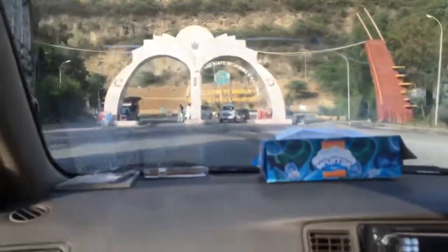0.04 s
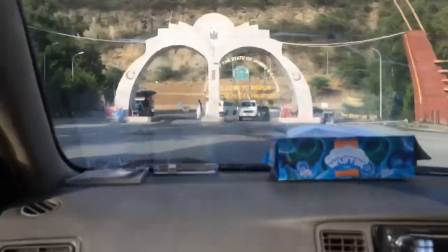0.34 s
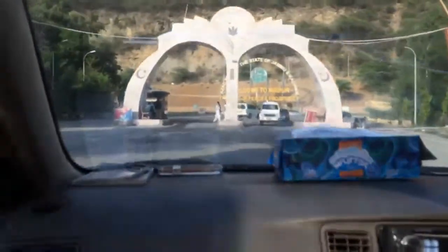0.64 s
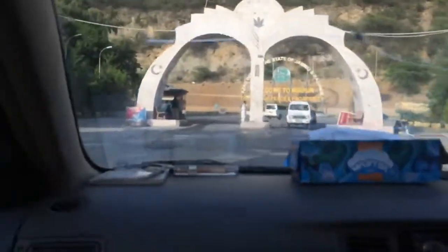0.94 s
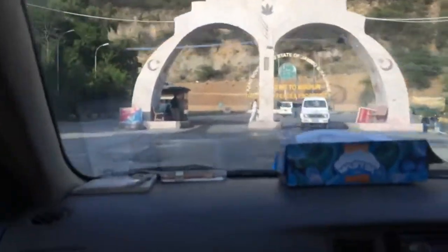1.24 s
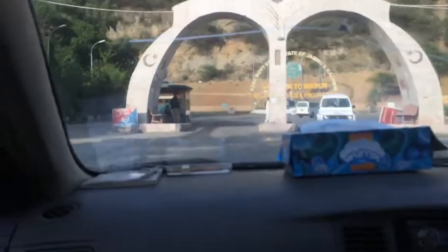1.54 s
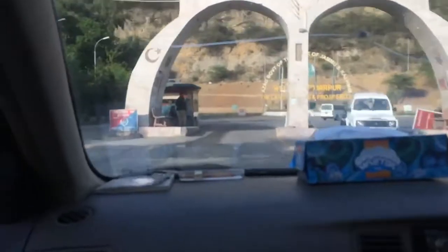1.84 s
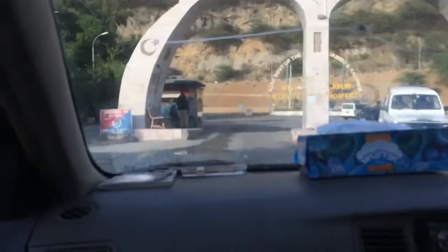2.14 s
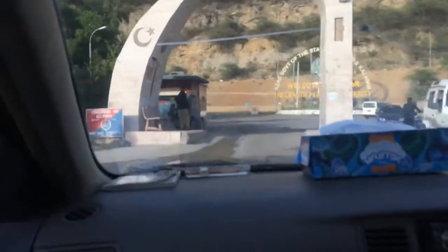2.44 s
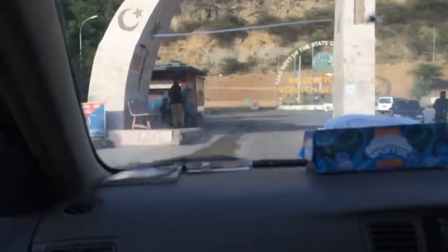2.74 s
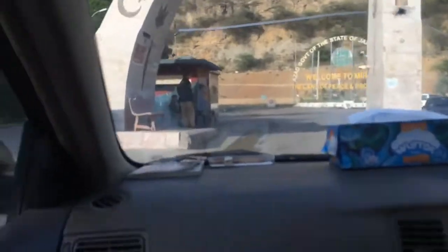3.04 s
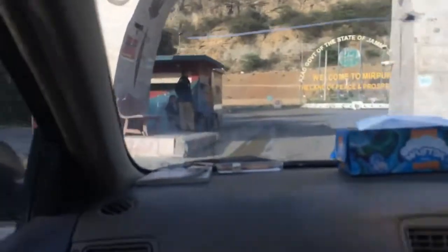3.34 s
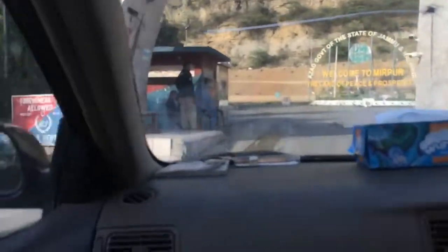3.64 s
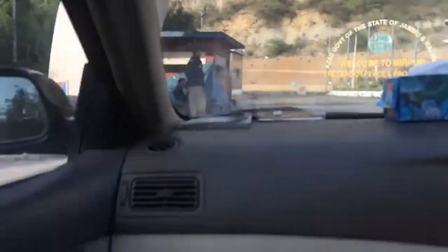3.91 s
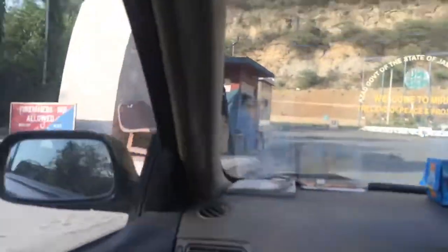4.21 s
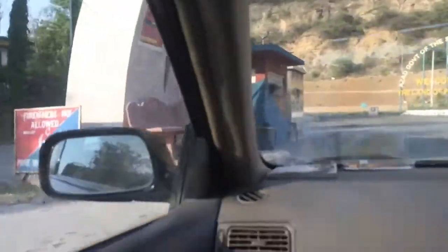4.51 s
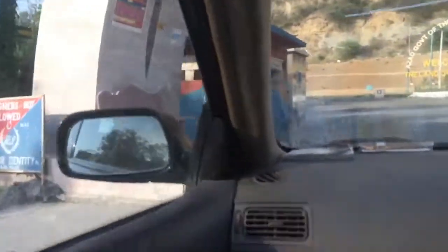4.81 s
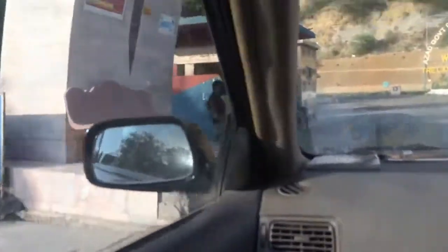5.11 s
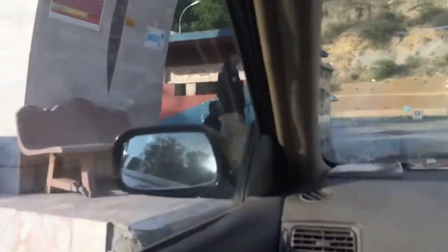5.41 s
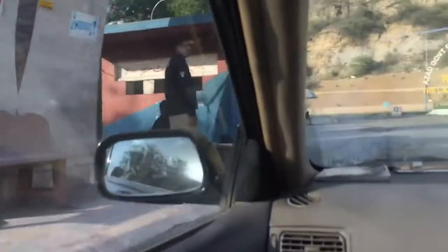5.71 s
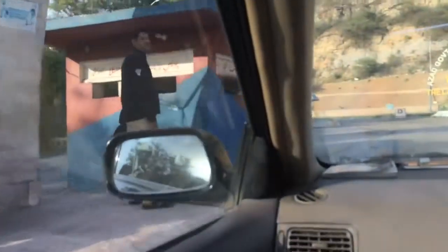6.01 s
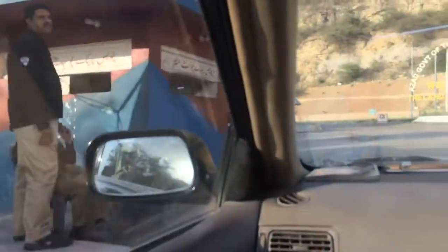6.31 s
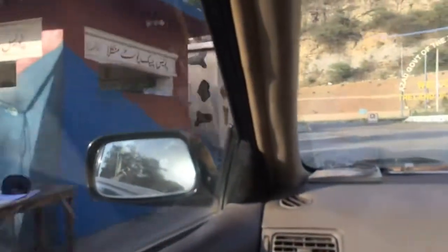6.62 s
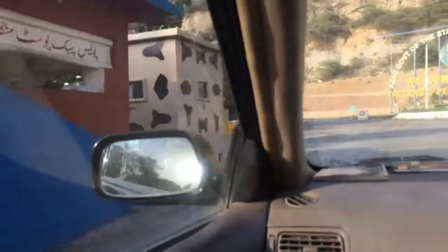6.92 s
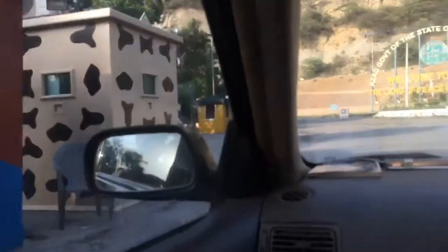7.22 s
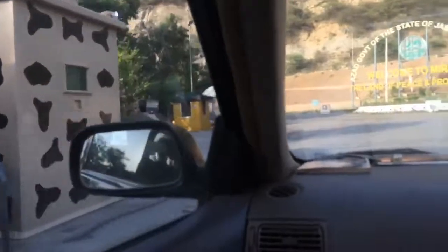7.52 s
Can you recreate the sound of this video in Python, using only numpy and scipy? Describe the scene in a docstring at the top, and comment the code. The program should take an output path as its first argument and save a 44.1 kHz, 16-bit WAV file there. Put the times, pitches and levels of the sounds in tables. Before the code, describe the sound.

Heard from inside the cabin, a car rolls slowly with a heavy low rumble, tyre roar and a diesel hum. Bumps rock the body, making the dashboard knock and the plastic trim chirp faintly. As the car passes through a stone gate, engine clatter and tyre hiss bounce off the walls and come in at an open side window. A deep, throbbing boom then fills the cabin to the end.

```python
"""A car's body heaves and booms, heard from inside as it rolls slowly through a stone gate.
Uneven ground rocks the body, and bumps make the plastic trim chirp and knock. Then the cabin air
settles into a deep boom. Underneath, the tyres roar and the diesel engine hums. Close walls throw
engine clatter and tyre hiss back in through an open side window."""
import sys
import numpy as np
from scipy import signal
from scipy.fft import rfft, irfft, next_fast_len
from scipy.io import wavfile
from scipy.ndimage import uniform_filter1d, minimum_filter1d, map_coordinates

SR = 44100
rng = np.random.default_rng(int(sys.argv[2]) if len(sys.argv) > 2 else 0)


def store_pcm(level_fs):
    """Save levels as 16-bit WAV."""
    pcm = np.round(np.clip(level_fs, -1, 1) * 32767).astype(np.int16)
    wavfile.write(sys.argv[1], SR, np.atleast_2d(pcm).T)


N = 341775


def amp(db):
    """Turn decibels into a number to multiply by."""
    return 10 ** (np.asarray(db) / 20)


def unit(x):
    """Scale a sound to an average strength (rms) of 1."""
    return x / np.sqrt(np.mean(x ** 2) + 1e-20)


def clock():
    """The time of every sample, in seconds."""
    return np.arange(N) / SR


def curves(rows):
    """Join a table's rows with straight lines: one curve for each column after the time."""
    times, *columns = np.transpose(rows)
    return [np.interp(clock(), times, column) for column in columns]


def swell(peak_s, width_s):
    """A bell-shaped rise and fall, still at 60% width_s either side of the peak."""
    return np.exp(-.5 * np.minimum(np.abs(clock() - peak_s) / width_s, 10) ** 2)


def passing(closest_s, db, width_s):
    """The strength of the echo off a passing wall, halved width_s either side of its closest moment."""
    return amp(db) / (1 + ((clock() - closest_s) / width_s) ** 2)


def wobble(per_s):
    """A smooth curve through per_s random values each second."""
    t = clock()[::8]
    points = rng.standard_normal(int(N * per_s / SR) + 4)
    return np.interp(clock(), t, map_coordinates(points, [t * per_s]))


def filtered(x, response):
    """Turn each frequency up or down by response(hz)."""
    size = next_fast_len(N + SR // 2)
    return irfft(rfft(x, size) * response(np.fft.rfftfreq(size, 1 / SR)), size)[:N]


def noise(colour):
    """Noise whose colour, its mix of lows and highs, follows a table."""
    table_hz, db = np.transpose(colour)
    gain = lambda hz: amp(np.interp(np.log(hz + 1), np.log(table_hz), db, -120, -120))
    return unit(filtered(rng.standard_normal(N), gain))


def ringing(notes):
    """Noise that rings in a few narrow bands."""
    gain = lambda hz: sum(amp(db) / (1 + ((hz - pitch) / width) ** 2) ** 1.5 for pitch, width, db in notes)
    return unit(filtered(rng.standard_normal(N), gain))


def patchy(x, depth_db):
    """Make random patches of time and pitch louder or softer."""
    spectrum = signal.stft(x, nperseg=1024)[2]
    patches = uniform_filter1d(rng.standard_normal(spectrum.shape), size=4, axis=0)
    patches = unit(uniform_filter1d(patches, size=14, axis=1))
    return unit(signal.istft(spectrum * amp(depth_db * patches), nperseg=1024)[1][:N])


def levelled(x, give):
    """Even out a noise's chance swells; less give makes it steadier."""
    outline = np.abs(signal.hilbert(x, next_fast_len(N))[:N])
    return unit(x / (outline + give))


def tone(hz, waver):
    """A clean note that wavers a little in pitch and loudness."""
    phase = 2 * np.pi * np.cumsum(hz) / SR
    return np.sqrt(2) * amp(1.8 * wobble(13)) * np.sin(phase + waver * wobble(12))


def fuzzy_tone(hz, width_hz):
    """A rough note: narrow noise around a steady or sliding pitch."""
    phase = 2 * np.pi * np.cumsum(hz + np.zeros(N)) / SR
    return unit(wobble(width_hz) * np.sin(phase) + wobble(width_hz) * np.cos(phase))


def firings(per_s, knock_at_s, ring_s, valve_tick):
    """A diesel's loudness pattern: a knock at each firing, a weaker valve tick halfway to the next."""
    count = np.cumsum(per_s) / SR
    count -= np.interp(knock_at_s, clock(), count)
    strength = amp(.8 * rng.standard_normal(4096))[np.floor(count).astype(int)]
    knock = lambda age_s: (1 - np.exp(-age_s / .0005)) * amp(-60 * age_s / ring_s)
    return unit(strength * knock(count % 1 / per_s) + valve_tick * knock((count + .5) % 1 / per_s))


# Patches of sand: peak_s, level_db, width_s
SAND_PATCHES = [(0.19, -67.5, 0.019), (1.39, -69, 0.11), (4.005, -70, 0.04), (4.2, -71.5, 0.12),
                (4.347, -71, 0.023), (4.503, -63, 0.025), (4.59, -63.5, 0.026), (4.87, -67, 0.18),
                (6.656, -66, 0.012)]

def sand():
    """Sand rustles briefly as a tyre rolls over it."""
    level = sum(amp(db) * swell(s, width) for s, db, width in SAND_PATCHES)
    colour = [(2000, -8), (4500, .5), (8500, -.5), (12000, -3.5), (15500, -11)]
    return level * unit(amp(2.4 * wobble(630)) * noise(colour))


# Colour of a distant diesel: frequency_hz, level_db
FAR_DIESEL_COLOUR = [(700, -24.5), (1600, -3.5), (2400, 2.5), (3200, -7.5), (4200, -16), (6500, -19.5),
                     (10000, -24.5), (15000, -42.5)]

def roadside_diesel():
    """Another, slower diesel clatters and fades behind the car."""
    start_db, hold_s, fade_db_per_s = -54, .11, 62
    clatter = firings(np.full(N, 32.0), knock_at_s=.014, ring_s=.08, valve_tick=.4)
    level_db = start_db - fade_db_per_s * np.maximum(clock() - hold_s, 0)
    return amp(level_db) * clatter * noise(FAR_DIESEL_COLOUR)


# Notes the pulleys ring at: pitch_hz, width_hz, level_db
PULLEY_NOTES = [(1040, 32, 1.5), (1510, 32, -4), (1280, 57, -1.5), (1660, 40, 4.5), (2330, 45, -7.5),
                (2520, 49, -9), (5850, 140, -19), (7750, 200, -19), (8040, 72, -11), (8500, 130, -15),
                (9300, 230, -20.5)]

def belt():
    """The belt's rising whine and the thin ring of its pulleys bounce off a hut by the gate."""
    peak_s, peak_db, hz_at_peak, rise_hz_per_s = 5.52, -49.5, 779, 125
    hz = hz_at_peak + rise_hz_per_s * (clock() - peak_s)
    whine = np.sqrt(2) * np.sin(2 * np.pi * np.cumsum(hz) / SR + .83 * wobble(55))
    pulleys = passing(closest_s=5.88, db=-53.5, width_s=.32) * ringing(PULLEY_NOTES)
    return amp(peak_db) * swell(peak_s, width_s=.2) * whine + pulleys


# Whines from the parts that turn the wheels: peak_s, pitch_hz, level_db, width_s, width_hz
DRIVE_WHINES = [(0.558, 496.2, -46.5, 0.37, 80.6), (0.6, 869, -52, 0.42, 89.9), (.4, 345.6, -52, .35, 90.3),
                (1.45, 1495, -61, 0.31, 373), (2.998, 351.3, -51, .22, 90.8), (3.45, 2026, -69, 0.061, 60),
                (3.952, 1940, -61.5, 0.073, 258.7), (4.89, 1070, -54.5, 0.26, 89),
                (4.893, 1524, -55.5, 0.055, 80), (6.145, 506.4, -48, 0.23, 69.95),
                (6.852, 482.4, -47.5, 0.41, 85.2), (6.793, 869, -59.5, 0.8, 69.9)]

def drive_train():
    """Rough notes come and go as the load on the drive train changes."""
    return sum(amp(db) * swell(s, width_s) * fuzzy_tone(hz, width_hz)
               for s, hz, db, width_s, width_hz in DRIVE_WHINES)


def squeak(start_s, hz, length_s, glide, rough):
    """Two surfaces stick and slip: a rough note that swells, slides and stops."""
    progress = np.linspace(0, 1, round(length_s * SR))
    waver = np.interp(progress * length_s, np.arange(256) / 1500, rng.standard_normal(256))
    pitch = hz * (1 + glide * (progress - .5) + rough * waver)
    sound = np.sqrt(np.abs(np.sin(np.pi * progress))) * np.sin(2 * np.pi * np.cumsum(pitch) / SR)
    return np.pad(sound, (round(start_s * SR), N))[:N]


def brake():
    """A brake pad sings once, very high."""
    return amp(-53) * squeak(start_s=3.783, hz=9140, length_s=.044, glide=.004, rough=.026)


def faint_chirps(flex, tries):
    """Chance slips, likelier the more the body twists, as rows of start_s, level_db, pitch_hz."""
    when, luck, size, pitch = rng.random((tries, 4)).T
    start_s = when * N / SR
    rows = np.column_stack([start_s, -70.5 + 6 * size, 4180 + 600 * (pitch - .5)])
    return rows[luck < np.interp(start_s, clock(), flex)]


# Twists of the body on uneven ground: peak_s, strength (0 to 1), width_s
BODY_TWISTS = [(0.714, 0.6, 0.37), (2.145, 0.3, 0.2), (3.162, 1, 0.54)]
# The loudest chirps: start_s, level_db (before a 3 dB cut), pitch_hz
LOUD_CHIRPS = [(.402, -62, 4400), (.744, -62, 4520), (.806, -63, 4550), (.822, -62, 4550),
               (.866, -62, 4730), (1.014, -60.5, 4500), (1.755, -71, 4440), (2.025, -62, 4300),
               (2.128, -68, 4150), (2.213, -69, 4300), (2.24, -64, 4540), (2.27, -63.5, 4350),
               (2.363, -53.5, 4470), (2.46, -56, 4380), (2.524, -55, 4400), (2.589, -56.5, 4420),
               (2.735, -61, 4220), (2.795, -59, 4400), (2.904, -56, 4480), (3.01, -60, 4500),
               (3.11, -63, 4350), (3.193, -58, 3980), (3.227, -57, 4020), (3.325, -59, 4000),
               (3.517, -60, 4030), (3.535, -55, 4170), (3.587, -63.5, 4240), (4.243, -57, 4413),
               (4.299, -54, 4420)]

def trim_squeaks():
    """The plastic trim rubs, chirping and chattering as the body twists."""
    flex = sum(strength * swell(s, width) for s, strength, width in BODY_TWISTS)
    chirps = sum(amp(db - 3) * squeak(s, hz, length_s=.012, glide=-.06, rough=.039)
                 for s, db, hz in [*LOUD_CHIRPS, *faint_chirps(flex, tries=300)])
    chatter = unit(amp(5.9 * wobble(90)) * fuzzy_tone(4200, width_hz=890))
    return chirps + amp(-74) * flex * chatter


def strike(start_s, ring_s):
    """The loudness of one hit: a quick rise, and a fall of 60 dB in ring_s."""
    age_s = clock() - start_s
    return np.clip(age_s / .0014, 0, 1) * amp(-60 * np.clip(age_s / ring_s, 0, 3))


# Knocks on the dashboard: start_s, level_db, ring_s, snap_db
DASH_KNOCKS = [(2.552, -42, 0.028, -58), (2.562, -42.5, 0.06, -57), (2.74, -44, 0.04, -53),
               (2.748, -43, 0.06, -62), (2.7625, -37.5, 0.06, -44), (2.768, -41.5, 0.055, -60),
               (2.773, -43, 0.05, -50), (2.9254, -44, 0.04, -54), (2.937, -47, 0.025, -55),
               (2.954, -47, 0.044, -58), (3.672, -42, 0.048, -61)]
# Notes of snapping plastic: pitch_hz, width_hz, level_db
SNAP_NOTES = [(2406, 98, 8.5), (2720, 140, 2), (4370, 440, -13.5)]
# Tiny ticks in the trim: start_s, level_db
TRIM_TICKS = [(2.378, -57), (2.397, -59), (2.553, -61), (2.745, -58), (2.768, -60), (2.826, -58),
              (2.88, -64), (2.966, -58)]
# Colours of the knocks and the ticks: frequency_hz, level_db
DASH_COLOUR = [(300, -6), (550, 12.5), (1000, 11), (1400, 8), (1900, -1), (2650, -11.5), (3300, -15),
               (4400, -12.5), (5500, -19.5), (8000, -22.5), (12000, -49.5)]
TICK_COLOUR = [(2500, -18.5), (4500, -0.5), (6500, 1.5), (8200, -4.5), (11000, -21.5), (15000, -30)]

def dashboard():
    """Loose things hit the dashboard, each with a plastic snap; the trim ticks around them."""
    knocks = sum(amp(db) * strike(s, ring_s) for s, db, ring_s, _ in DASH_KNOCKS)
    snaps = sum(amp(db) * strike(s, ring_s=.045) for s, _, _, db in DASH_KNOCKS)
    ticks = sum(amp(db) * strike(s, ring_s=.014) for s, db in TRIM_TICKS)
    return (knocks * levelled(noise(DASH_COLOUR), give=1.2)
            + snaps * levelled(ringing(SNAP_NOTES), give=.4)
            + ticks * noise(TICK_COLOUR))


# Panel notes set off by bumps: peak_s, pitch_hz, level_db, width_s
PANEL_NOTES = [(2.334, 810, -39, 0.0083), (2.327, 405, -42, 0.027), (2.344, 170, -30.5, 0.019),
               (2.564, 202.6, -32, 0.014), (4.064, 448.4, -46, 0.019), (4.172, 445, -43.5, 0.091),
               (4.19, 187, -32, 0.052), (5.453, 66, -26.5, 0.035)]

def panels():
    """The wheels hit bumps, and body panels answer with short, dull notes."""
    return sum(amp(db) * swell(s, width) * levelled(fuzzy_tone(hz, width_hz=.25 * hz), give=.67)
               for s, hz, db, width in PANEL_NOTES)


# How fast the engine fires: time_s, firings_per_s
ENGINE_SPEED = [(0, 43), (.5, 43), (.8, 44.6), (1.6, 44.6), (2.1, 43.3), (2.6, 46), (3.3, 47), (4.1, 46.4),
                (4.5, 42.3), (4.8, 41.5), (5.1, 41.7), (5.3, 42.8), (5.55, 46), (6.1, 45), (6.7, 43.2),
                (7.1, 43.4), (7.35, 47), (7.75, 47.2)]
# Notes in its hum: multiple (of the firing rate), level_db
HUM_NOTES = [(2, 3), (3, -3), (4, -7.5)]
# Its note under load, at five times the firing rate: time_s, level_db
LOAD_NOTE_LEVEL = [(0, -52.5), (2.4, -51), (2.9, -45.5), (3.3, -43.5), (3.8, -45.5), (4.2, -52),
                   (5.6, -53.5), (6.1, -50), (6.9, -48.5), (7.2, -51), (7.5, -45), (7.75, -49)]
# Colour of each firing's crack: frequency_hz, level_db
CRACK_COLOUR = [(500, -27), (1000, -9), (1500, -7.5), (1800, -1), (2300, -2.5), (2700, -7.5), (4000, -15),
                (6000, -16), (8500, -15), (11000, -19.5), (15000, -43.5)]
# Notes of the engine block and the valve cover: pitch_hz, width_hz, level_db
BLOCK_NOTES = [(1817, 125, 7.5), (2000, 170, -1.5), (2380, 220, -2.5)]
COVER_NOTES = [(3070, 170, 3), (3950, 510, -8), (4360, 300, -8), (5570, 120, -5), (5900, 190, 1)]

def engine():
    """The engine hums through the body; its firings ring the metal and echo off the gate wall."""
    rate, = curves(ENGINE_SPEED)
    hum = amp(-40) * unit(sum(amp(db) * tone(multiple * rate, waver=.36) for multiple, db in HUM_NOTES))
    load_note = amp(curves(LOAD_NOTE_LEVEL)[0]) * tone(5 * rate, waver=.4)
    crack = firings(rate, knock_at_s=5.1595, ring_s=.025, valve_tick=.25) * noise(CRACK_COLOUR)
    blows = firings(rate, knock_at_s=5.1595, ring_s=.042, valve_tick=.22)
    block = blows * levelled(ringing(BLOCK_NOTES), give=.4)
    cover = blows * levelled(ringing(COVER_NOTES), give=.4)
    knock_echo = passing(closest_s=5.17, db=-45, width_s=.19) * (amp(-13) * crack + block)
    cover_echo = passing(closest_s=5.3, db=-54, width_s=.15) * cover
    return hum + load_note + knock_echo + cover_echo


# Kerb, gate, hut and tower going by: closest_s, hiss_db, grit_db, width_s
PASSING_WALLS = [(4.55, -53.5, -72.5, 0.51), (5.2, -53.5, -58, 0.4), (5.85, -58.5, -70.5, 0.71),
                 (7.351, -61.5, -74, 0.74)]
# Colours of tyre hiss and fizzing grit: frequency_hz, level_db
HISS_COLOUR = [(600, -28.5), (1000, 1), (1500, -0.5), (1850, 0), (2400, -2), (3100, -8), (4200, -14),
               (5800, -15), (8000, -16), (12000, -50.5)]
GRIT_COLOUR = [(2000, -16.5), (3500, 3), (5000, -1), (6000, -4), (8200, -4), (9500, -6), (11500, -13),
               (15000, -24)]

def window_hiss():
    """Tyre hiss and grit come in at the window, swelling as each wall throws them back."""
    open_road_hiss_db, open_road_grit_db = -62, -82
    hiss_power = amp(open_road_hiss_db) ** 2
    grit_power = amp(open_road_grit_db) ** 2
    for s, hiss_db, grit_db, width in PASSING_WALLS:
        hiss_power += passing(s, hiss_db, width) ** 2
        grit_power += passing(s, grit_db, width) ** 2
    hiss = amp(1.1 * wobble(130)) * patchy(noise(HISS_COLOUR), depth_db=2.5)
    grit = amp(2.6 * wobble(300)) * patchy(noise(GRIT_COLOUR), depth_db=2.3)
    return np.sqrt(hiss_power) * hiss + np.sqrt(grit_power) * grit


# How coarse the road is, smoother at the gate: time_s, roughness_db
ROAD_ROUGHNESS = [(0, 8.5), (.55, 11), (1.7, -3.5), (2.3, -0.5), (3.2, -1.5), (3.7, -9.5), (4.7, -2),
                  (5.05, -29), (5.4, -4.5), (5.75, -12), (6.25, -7), (7.75, -18)]
# Hum of the tread: time_s, pitch_hz, level_db
TYRE_HUM = [(0, 165, -40), (.3, 160, -32.5), (.65, 150, -31), (.95, 143, -35.5), (1.25, 140, -30),
            (1.7, 132, -36), (2.05, 127, -30.5), (2.45, 122, -31), (2.75, 116, -33.5), (3.1, 120, -36.5),
            (3.8, 120, -47.5), (5.0, 125, -49.5), (6.2, 130, -41.5), (7.75, 128, -45.5)]
# Roar of the tread: time_s, level_db
ROAR_LEVEL = [(0, -40.5), (.7, -41.5), (1.1, -43), (2.7, -43.5), (3.8, -45), (4.2, -42), (4.45, -44),
              (4.75, -42), (5.1, -45.5), (5.75, -45.5), (6.0, -42.5), (7.3, -44), (7.75, -45.5)]
# Colours of the floor's drone and the tread's roar: frequency_hz, level_db
FLOOR_COLOUR = [(70, -34), (105, -6.5), (135, 4), (165, 0.5), (200, -2.5), (240, -4), (290, -11),
                (400, -27.5), (800, -63)]
ROAR_COLOUR = [(150, -25.5), (270, -8), (330, 2.5), (385, -2), (490, 4), (600, -1.5), (740, -4),
               (870, -4.5), (1000, -9), (1300, -15.5), (1800, -20), (3000, -47.5), (6000, -59)]

def tyres():
    """The tread roars, and hums lower as the car slows; coarser road makes the floor drone louder."""
    load = wobble(13)  # uneven asphalt presses on the tyres and lets go
    road_db, = curves(ROAD_ROUGHNESS)
    hum_hz, hum_db = curves(TYRE_HUM)
    roar_db, = curves(ROAR_LEVEL)
    hum = amp(hum_db + 1.5 * load) * fuzzy_tone(hum_hz, width_hz=21)
    drone = amp(-36.5 + .35 * road_db + 1.4 * load) * noise(FLOOR_COLOUR)
    roar = amp(roar_db + .16 * load + wobble(60)) * patchy(noise(ROAR_COLOUR), depth_db=1.03)
    return hum + drone + roar


# Low notes in the cabin: peak_s, pitch_hz, level_db, width_s
AIR_NOTES = [(.25, 85, -33.5, .14), (.6, 143, -34.5, .13), (.95, 133, -34.5, .18), (1.5, 132, -35, .14),
             (1.83, 78.6, -27.5, .13), (2.2, 130.5, -28.5, .17), (2.45, 145.5, -30, .14),
             (2.88, 85, -22, .11), (3.1, 134, -30.5, .17), (3.457, 80, -31, 0.076), (5.37, 132, -37, .13),
             (6.3, 133.4, -37, .22), (6.38, 148.3, -42, .13), (7.35, 129.2, -37, .25)]

def cabin_notes():
    """Road and engine stir the cabin air in soft, low swells."""
    return sum(amp(db) * swell(s, width) * tone(hz, waver=.36) for s, hz, db, width in AIR_NOTES)


# The deep boom: time_s, pitch_hz, level_db
CABIN_BOOM = [(4.8, 24.69, -26.5), (4.93, 25.58, -14.5), (5.12, 25.13, -11), (5.55, 25.06, -11),
              (5.75, 25.35, -8.5), (6.15, 28.35, -12), (6.45, 30.47, -12), (7.0, 30.52, -16.5),
              (7.3, 30, -12), (7.75, 28.2, -15)]

def boom():
    """The cabin air throbs unevenly at one deep, slowly sliding pitch."""
    hz, db = curves(CABIN_BOOM)
    phase = 2 * np.pi * np.cumsum(hz * (1 + .028 * wobble(20))) / SR
    throb_db = -wobble(25)
    return amp(db + throb_db) * np.sqrt(2) * np.sin(phase)


# Steady shaking, calmer on the paving under the gate: time_s, level_db
SHAKE_LEVEL = [(0, -15.5), (.35, -12.5), (.52, -15.5), (.65, -13.5), (1.35, -15), (1.77, -14.5), (2.1, -14),
               (2.8, -17), (3.15, -16.5), (3.6, -17), (3.83, -19), (3.94, -15.5), (4.15, -13), (4.3, -12),
               (4.6, -17.5), (4.8, -24), (5.1, -19.5), (5.45, -21), (5.65, -20.5), (6.2, -18.5),
               (7.75, -21.5)]
# Dips and humps in the road: peak_s, level_db, width_s
ROAD_JOLTS = [(0.72, -13, 0.088), (2.356, -3.5, 0.017), (2.455, -8, 0.033), (2.561, -5, 0.037),
              (2.735, -5.5, 0.057), (2.946, -5.5, 0.08), (3.375, -9, 0.047), (3.501, -5.5, 0.028),
              (3.65, -9.5, 0.04), (4.326, -12.5, 0.019), (4.42, -9.5, 0.048)]
# Colours of the shaking, the rocking and the springs' thud: frequency_hz, level_db
SHAKE_COLOUR = [(8, 0.5), (15, 1), (24, -5), (30, 0.5), (40, -4), (50, -3), (58, -16), (80, -24.5),
                (130, -61.5)]
ROCK_COLOUR = [(10, -20.5), (18, -14), (27, 2), (33, -0.5), (42, -10), (58, -17.5), (80, -28.5),
               (130, -66.5)]
THUD_COLOUR = [(35, -19.5), (50, -7.5), (64, -5.5), (85, -5.5), (100, -11), (135, -18), (250, -58)]

def car_body():
    """The body shakes all the time and rocks at each jolt; the springs thud along with both."""
    lurch = amp(.67 * wobble(16))
    shake = amp(curves(SHAKE_LEVEL)[0]) * lurch
    rock = sum(amp(db) * swell(s, width) for s, db, width in ROAD_JOLTS)
    road_db, = curves(ROAD_ROUGHNESS)
    thud = amp(-25 + .044 * road_db) * np.hypot(shake, rock) ** .43
    return (thud * noise(THUD_COLOUR)
            + shake * levelled(noise(SHAKE_COLOUR), give=1.1)
            + rock * levelled(noise(ROCK_COLOUR), give=.58))


def scene():
    """Add up everything heard in the cabin, as one channel."""
    rolling = car_body() + tyres() + window_hiss() + sand()
    rattles = panels() + dashboard() + trim_squeaks() + brake()
    air = boom() + cabin_notes()
    machines = engine() + belt() + drive_train() + roadside_diesel()
    return (rolling + rattles + air + machines)[None]


def record(dry):
    """Turn the biggest swings down so they do not overload, and cut the very highest treble."""
    ceiling, top_hz = .98, 15700
    needed = np.minimum(1, ceiling / (np.abs(dry[0]) + 1e-9))
    held = minimum_filter1d(needed, size=400)
    gain = uniform_filter1d(uniform_filter1d(held, size=200), size=200)
    edge_fade = signal.windows.tukey(N, .0005)
    return filtered(dry[0] * gain * edge_fade, lambda hz: hz < top_hz)[None]


dry = scene()
out = record(dry)
store_pcm(out)
```